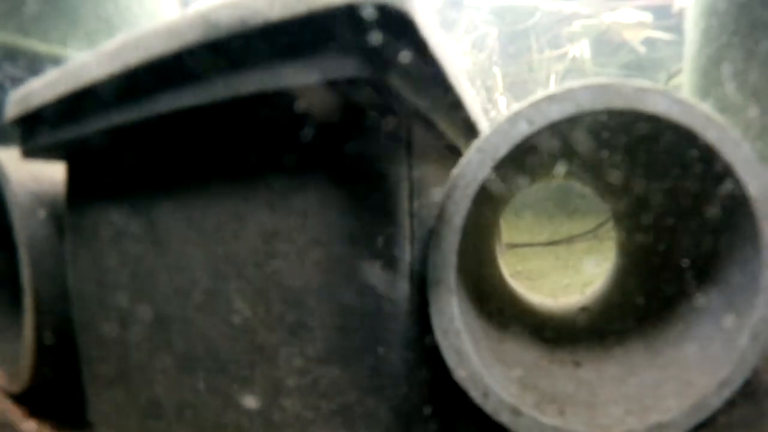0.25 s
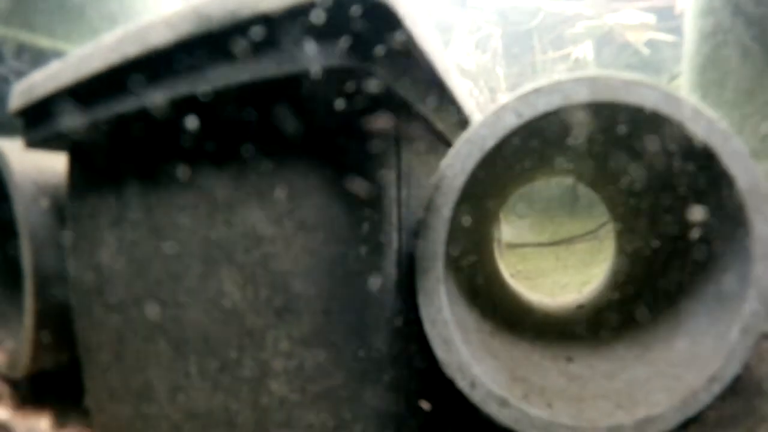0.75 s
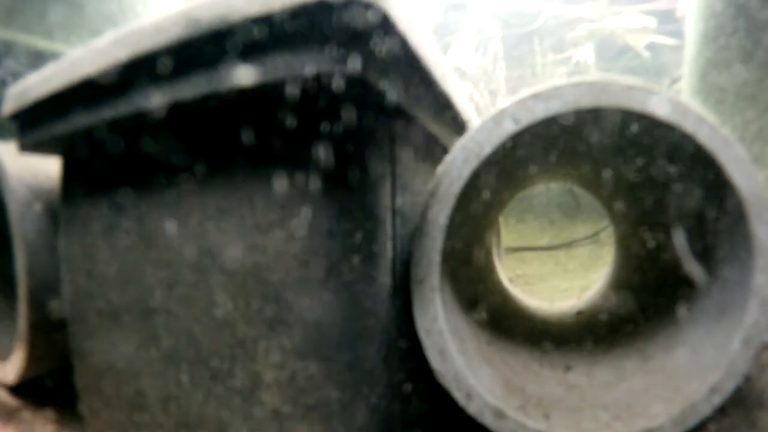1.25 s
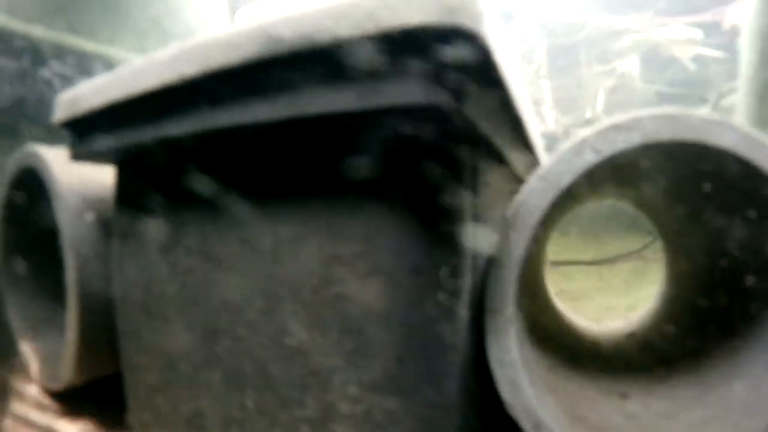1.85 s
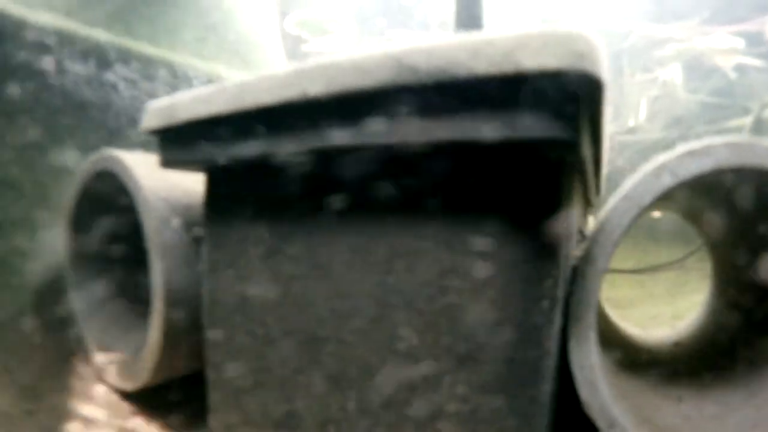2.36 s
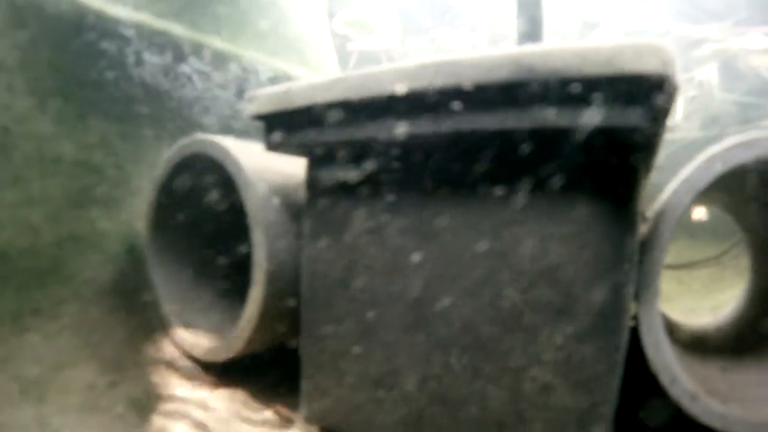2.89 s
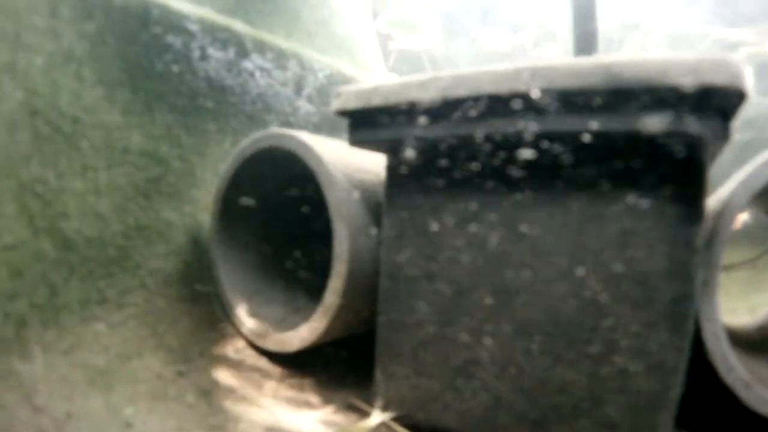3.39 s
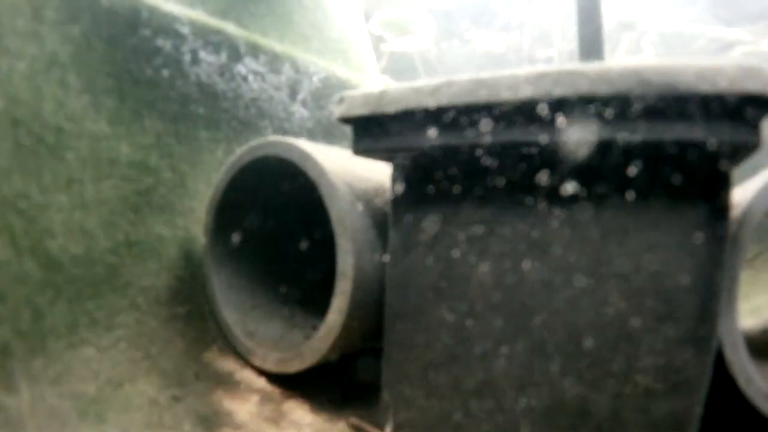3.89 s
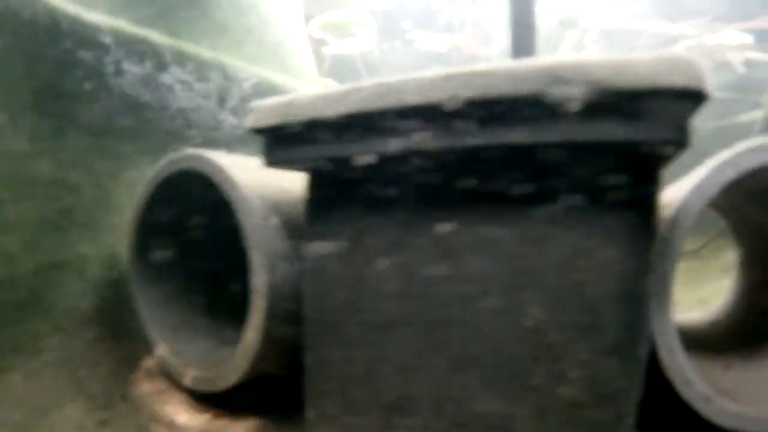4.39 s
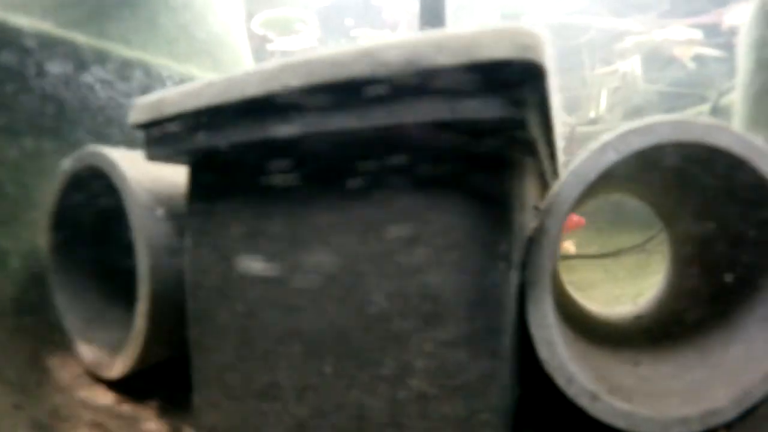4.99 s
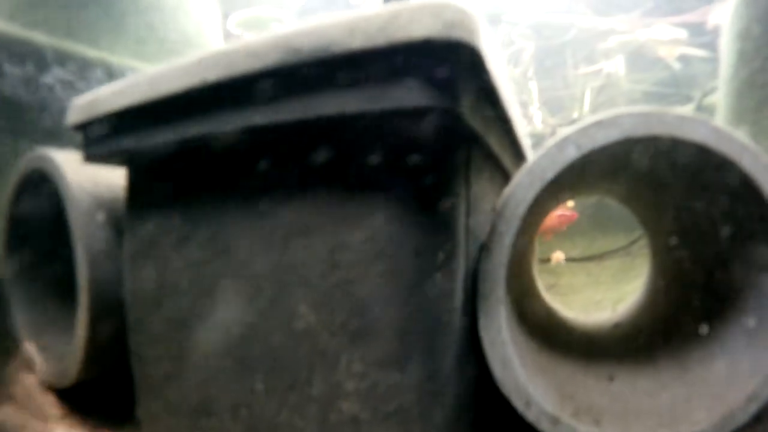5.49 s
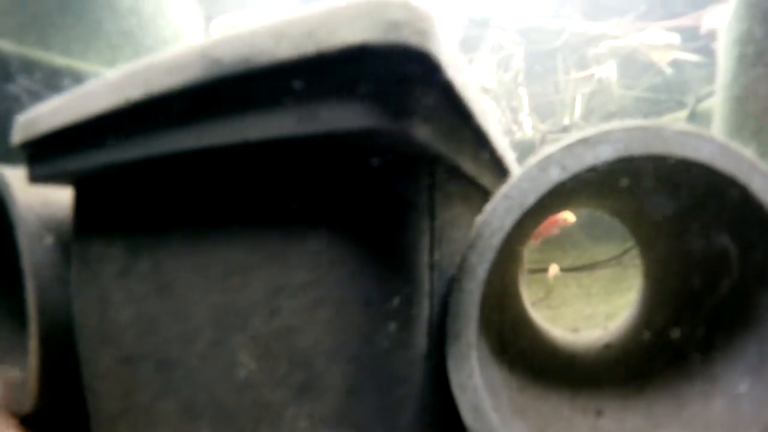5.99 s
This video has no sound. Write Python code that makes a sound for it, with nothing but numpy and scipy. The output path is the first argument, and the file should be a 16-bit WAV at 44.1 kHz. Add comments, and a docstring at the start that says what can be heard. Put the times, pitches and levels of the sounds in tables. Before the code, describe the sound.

A low electrical drone from a submerged filter pump fills the pond, heard through a sealed camera housing. Its impeller ticks quickly, clearer near the pipe, weaker by the box, with short rattles coming and going. Faint rushing water and small bubble pops lie underneath. Very faint rubbing comes early and late; one sharp thudding clack strikes just past halfway, then a gentler thump. The hum continues to the end.

```python
"""Pump hum, light chatter and bouts of rattling are heard from the start and run on in a garden pond.
The hum is a stack of sine and cosine waves; taps and rattles are short noise bursts timed by the turning impeller.
Shaped noise makes the churning and rushing water, and brief resonant bursts make its bubbles.
Now and then a submerged camera's housing is rubbed or knocked: noise and fading tones. As the camera drifts,
the hum, light taps, water rush and small bubbles change level. A gain control tames the peaks, and a coarse
sample-and-hold converter adds a glassy sheen."""
import sys
import numpy as np
from scipy import signal
from scipy.fft import rfft, irfft
from scipy.io import wavfile
from scipy.ndimage import map_coordinates

SR = 44100
rng = np.random.default_rng(int(sys.argv[2]) if len(sys.argv) > 2 else 0)


def store_pcm(level_fs):
    """Save levels as 16-bit WAV."""
    pcm = np.round(np.clip(level_fs, -1, 1) * 32767).astype(np.int16)
    wavfile.write(sys.argv[1], SR, np.atleast_2d(pcm).T)


N = 275625  # length of the scene in samples

# The camera's drift: [time_s, place (0 = mouth of the wide pipe, 1 = in front of the filter box)]
CAMERA_PATH = [(0, 0.071), (1.3, 0), (2.3, 0.28), (3.1, 0.53), (4.05, 1), (4.5, 0.54), (5.1, 0.26),
               (6.25, 0)]

# Churning water: [frequency_hz, relative_level_db per Hz]
CHURN_SPECTRUM = [(10, -13), (28, -13), (44, 1.5), (68, -5), (95, -3.5), (135, 0), (175, -7), (215, -16),
                  (280, -16), (330, -28.5), (500, -45), (900, -56)]
# Rush of the outflow: [frequency_hz, relative_level_db per Hz]
FLOW_SPECTRUM = [(150, -11), (350, -1.5), (500, 0), (680, -4), (830, -2.5), (1130, -11), (1420, -2),
                 (1600, -7), (2100, -2.5), (2600, -6.5), (2850, -10), (3380, -12.5), (3600, -9),
                 (4700, -15), (5800, -16.5), (7000, -34)]
# The largest bubbles: [start_s, peak_db, pitch_hz]
LARGE_BUBBLES = [(.2514, -38, 1474), (.8735, -45, 4060), (2.0856, -41.5, 1430), (2.3095, -43.5, 3950),
                 (2.7037, -38.5, 2270), (2.7752, -41, 3660), (2.855, -43.5, 1690), (4.545, -41.5, 1890),
                 (4.997, -42.5, 3670), (5.032, -41, 1930), (5.1163, -37.5, 1770)]

# Fingers slipping on the housing: [start_s, length_s, level_db]
HOUSING_RUBS = [(1.165, 0.048, -55.5), (1.215, 0.056, -54.5), (4.784, 0.047, -56), (4.81, 0.029, -51.5),
                (5.488, 0.032, -64), (5.584, 0.037, -60)]
# Rasp of skin on the housing: [frequency_hz, relative_level_db per Hz]
RASP_SPECTRUM = [(150, -22), (350, -11), (750, -1), (1050, -17), (3300, -13), (3680, -2.5), (4000, -29),
                 (7000, -35)]
# Blows on the housing: [start_s, hard_face_db, soft_edge_db, thump_db]
HOUSING_KNOCKS = [(3.4915, -19.5, -66, -7), (3.4941, -16, -61, -2), (3.515, -43, -60, -1.5),
                  (3.518, -47, -56, -30), (4.4483, -39, -45, -15), (4.4515, -39, -27, -10),
                  (4.474, -50, -61.5, -32)]
# The crack of a contact: [frequency_hz, relative_level_db per Hz]
CRACK_SPECTRUM = [(150, -32), (300, -20), (480, 3), (680, 6), (1050, -3.5), (1400, 1), (1750, 6.5),
                  (2300, 1), (2650, -3), (3300, -10), (4200, -18), (5800, -16.5), (7000, -60)]
# Tones of the housing, hard face struck: [pitch_hz, level_db, t60_s (time to fade by 60 dB)]
FACE_MODES = [(610, -10, 0.036), (711, -7, 0.031), (885, -20, 0.031), (1320, -10.5, 0.044),
              (1694, -7.5, 0.027), (1977, -10, 0.041), (2180, -8, 0.026), (2260, -6.5, 0.027),
              (2750, -18, 0.025), (3273, -0.5, 0.013), (3525, -12.5, 0.019)]
# Tones of the housing, soft edge struck or rubbed: [pitch_hz, level_db, t60_s]
EDGE_MODES = [(370, -6, 0.085), (448, -5, 0.065), (570, -6, 0.047), (1284, -3, 0.029), (1380, -7.5, 0.053),
              (1790, -1.5, 0.044), (2306, -3.5, 0.056), (3670, -6.5, 0.07)]
# The housing rocking in the water: [pitch_hz, level_db, t60_s]
ROCKING_MODES = [(28, -22, 0.15), (45, -16, 0.31), (87, -5.5, 0.085), (102, -32.5, 0.99)]

# Magnetic hum: [multiple of the mains frequency, relative_level_db]
MAGNETIC_TONES = [(2, -0.5)]
# Shaft vibration: [multiple of the mains frequency, relative_level_db]
SHAFT_TONES = [(1, 2.1), (3, 4.82)]
# Overtones of the hum: [multiple of the mains frequency, relative_level_db]
BUZZ_TONES = [(4, 0.5), (5, -2.5), (6, -15.5), (8, -21.5)]

# Resonances of the pump casing: [pitch_hz, width_hz, level_db]
CASING_RESONANCES = [(1456, 100, 4), (1747, 77, -1), (1999, 138, 3), (2235, 120, 3.5), (2595, 146, 2.5),
                     (3000, 92, -1.5), (3230, 74, -1.5), (3620, 200, 1.5), (4240, 250, -1.5),
                     (5280, 250, 0)]
# Light taps in every turn: [angle (share of a turn), peak_db before drift and chance]
LIGHT_TAPS = [(.68, -47.5), (0.95, -53), (0.1498, -52.5)]
# Bouts of hard rattling: [start_s (moved to the nearest strike), turns, peak_db before chance]
RATTLE_BOUTS = [(.01, 1, -32), (.06, 1, -33), (.21, 4, -34.5), (.28, 2, -33.5), (.33, 1, -38),
                (.51, 1, -42.5), (.78, 1, -33), (.955, 2, -37), (1.01, 2, -37.5), (1.11, 1, -35),
                (1.18, 6, -36.5), (1.33, 1, -35.5), (1.395, 1, -35.5), (1.53, 3, -35.5), (1.58, 1, -33.5),
                (1.66, 1, -40.5), (1.96, 2, -36.5), (2.145, 2, -38), (2.645, 3, -38), (3.06, 4, -39),
                (3.345, 4, -41), (3.695, 21, -40.5), (3.945, 1, -33), (4.13, 3, -39), (4.245, 1, -37),
                (4.68, 1, -34), (4.71, 7, -35.5), (5.38, 7, -38), (5.91, 3, -33)]

# What the drift changes, each as (at the pipe, at the box)
FLOW_DB = (-58.5, -60.5)  # middle level of the outflow rush
MAGNETIC_DB, SHAFT_DB, BUZZ_DB = (-28, -32), (-46.5, -45), (-61, -54.5)  # added to the tone levels
CHATTER_DB = (-1.5, -9.5)  # added to the light taps
CHATTER_HZ = (2070, 2600)  # middle pitch of the impeller's taps and strikes

MAINS_HZ = 59.996  # also the impeller's turns per second
UNREST_DB, UNREST_PER_S = 1.5, 9  # swing of the light chatter, and its random points per second
STRIKE_ANGLE, ANGLE_JITTER = .66, .018  # shares of a turn
REBOUND_DB, STRIKE_SCATTER_DB = 4.5, 1.44  # drop of every second strike; chance spread of the strikes
RASP_DB = 1  # the skin's rasp over the ring of the housing
CEILING_DB, ATTACK_S, RECOVER_DB_PER_S = -7, .02, 61  # gain control
HOLD_HZ, TOP_HZ = 12000, 15400  # converter's slow sample rate; upper limit of the output


def amp(db):
    """Turn decibels into a gain."""
    return 10 ** (np.asarray(db) / 20)


def unit(x):
    """Scale a sound to an average (rms) level of 1."""
    return x / np.sqrt(np.mean(x ** 2) + 1e-20)


def wobble(rate):
    """A smooth random curve through this many random points a second."""
    points = rng.standard_normal(int(N * rate / SR) + 4)
    return map_coordinates(points, [np.arange(N) * rate / SR])


def drift(ends, s):
    """Slide a value between (at the pipe, at the box) as the camera moves, at the times s."""
    times, places = np.transpose(CAMERA_PATH)
    place = np.interp(s, times, places)
    at_pipe, at_box = ends
    return at_pipe + place * (at_box - at_pipe)


def noise(spectrum):
    """Random noise of rms 1, its frequencies weighted by a spectrum table."""
    hz, db = np.transpose(spectrum)
    grid = np.fft.rfftfreq(N, 1 / SR)
    weight = amp(np.interp(np.log(grid + 1), np.log(hz + 1), db))
    return unit(irfft(rfft(rng.standard_normal(N)) * weight, N))


def dying(t, t60):
    """A fading curve that loses 60 dB in t60 seconds."""
    return np.exp(-np.log(1000) * t / t60)


def ring(modes, scatter_db):
    """Half a second of an object's fading tones, with chance changes in their strengths on each call."""
    t = np.arange(SR // 2) / SR
    sound = np.zeros(len(t))
    for hz, db, t60 in modes:
        strength = amp(db + scatter_db * rng.standard_normal())
        sound += strength * dying(t, t60) * np.sin(2 * np.pi * hz * t)
    return sound


def add(track, s, sound):
    """Mix a sound into the track at time s."""
    start = int(np.clip(round(s * SR), 0, N))
    track[start:start + len(sound)] += sound[:N - start]


def ticks(times, db, hz, q, t60, body=np.ones_like, size=2048):
    """Short bursts of crowded reflections, each through its own resonance and a shared body; db sets the peaks."""
    t, f = np.arange(size) / SR, np.fft.rfftfreq(size, 1 / SR)
    bursts = rng.standard_normal((len(times), size)) * dying(t, t60)
    ratio = f / hz[:, None]
    resonance = 1j * ratio / (q * (1 - ratio ** 2) + 1j * ratio)  # a higher q gives a purer pitch
    shapes = irfft(rfft(bursts) * resonance ** 2 * body(f), size)
    track = np.zeros(N)
    for s, gain, shape in zip(times, amp(db), shapes):
        add(track, s, gain * shape / np.abs(shape).max())
    return track


def casing(f):
    """Response of the pump casing: a sum of resonances that strengthens certain pitches."""
    response = 0
    for hz, width, db in CASING_RESONANCES:
        response = response + amp(db) * 1j * f * width / (hz ** 2 - f ** 2 + 1j * f * width)
    return response


def bubbles(count, low_hz, high_hz, db, spread_db, q, t60):
    """Small bubbles, drawn through the pump, pop at random moments; db is (at the pipe, at the box)."""
    when, size, force = rng.random((count, 3)).T
    times = when * N / SR
    peak_db = drift(db, times) + spread_db * force ** 2  # squaring keeps strong pops rare
    pitch_hz = low_hz + size * (high_hz - low_hz)
    return ticks(times, peak_db, pitch_hz, q, t60, body=casing)


def water():
    """Water churns low and rushes out as shaped noise, while bubbles ring briefly at many pitches."""
    churn = amp(-43.5 + 0.91 * wobble(7)) * noise(CHURN_SPECTRUM)
    flow_db = drift(FLOW_DB, np.arange(N) / SR) + 0.68 * wobble(3.0) + 1.3 * wobble(25)
    flow = amp(flow_db) * noise(FLOW_SPECTRUM)
    s, db, hz = np.transpose(LARGE_BUBBLES)
    plops = ticks(s, db, hz, q=8.3, t60=0.018)
    blips = bubbles(count=40, low_hz=1340, high_hz=1490, db=(-54, -63), spread_db=10.0, q=14, t60=0.014)
    crackle = bubbles(count=100, low_hz=1650, high_hz=2450, db=(-50, -60), spread_db=12.5, q=2.8, t60=0.0035)
    fizz = bubbles(count=130, low_hz=3240, high_hz=5060, db=(-59, -57), spread_db=13.5, q=5.2, t60=0.024)
    return churn + flow + plops + blips + crackle + fizz


def rubs():
    """Tiny finger slips rasp and set the housing's soft-edge tones ringing."""
    track = np.zeros(N)
    body = ring(EDGE_MODES, scatter_db=1)
    body = body / np.linalg.norm(body)
    for s, length, db in HOUSING_RUBS:
        n = int(length * SR)
        fade = signal.windows.tukey(n)
        slips = unit(rng.standard_normal(n) ** 3 * fade)  # cubing makes a few slips stand out
        add(track, s, amp(db) * signal.fftconvolve(slips, body))
        add(track, s, amp(db + RASP_DB) * noise(RASP_SPECTRUM)[:n] * fade)
    return track


def knocks():
    """Each blow cracks, rings the housing and rocks it in the water."""
    track, t = np.zeros(N), np.arange(SR // 2) / SR
    for s, face_db, edge_db, thump_db in HOUSING_KNOCKS:
        crack = noise(CRACK_SPECTRUM)[:len(t)] * dying(t, 0.039)
        contact = 1 - dying(t, 0.0019)  # the force builds up as the surfaces press together
        face = amp(face_db) * (crack + ring(FACE_MODES, scatter_db=5.0))
        edge = amp(edge_db) * ring(EDGE_MODES, scatter_db=0.5)
        slow_start = 1 - dying(t, 0.011)
        thump = amp(thump_db) * ring(ROCKING_MODES, scatter_db=1.0) * slow_start
        add(track, s, contact * (face + edge - thump))
    return track


def tone_stack(tones, wave, t):
    """Add up steady waves at multiples of the mains frequency."""
    total = np.zeros(N)
    for multiple, db in tones:
        # the square root of 2 makes db an rms level
        total += np.sqrt(2) * amp(db) * wave(2 * np.pi * multiple * MAINS_HZ * t)
    return total


def hum():
    """The stator pulls twice a mains cycle; a quarter cycle apart, the unbalanced rotor shakes once a turn."""
    t = np.arange(N) / SR
    pull = amp(drift(MAGNETIC_DB, t)) * tone_stack(MAGNETIC_TONES, np.sin, t)
    shake = amp(drift(SHAFT_DB, t)) * tone_stack(SHAFT_TONES, np.cos, t)
    buzz = amp(drift(BUZZ_DB, t)) * tone_stack(BUZZ_TONES, np.sin, t)
    return pull + shake + buzz


def impeller():
    """The loose impeller taps its bearing lightly at nearly the same angles of each turn."""
    turns = np.arange(int(N / SR * MAINS_HZ))
    turn_samples = (turns / MAINS_HZ * SR).astype(int)
    unrest_db = UNREST_DB * wobble(UNREST_PER_S)[turn_samples]
    track = np.zeros(N)
    for angle, tap_db in LIGHT_TAPS:
        late, force, detune = rng.standard_normal((len(turns), 3)).T
        times = (turns + angle + .03 * late) / MAINS_HZ
        force_db = 6.6 * np.tanh(0.79 * force)  # the play in the bearing bounds the swing
        peak_db = tap_db + drift(CHATTER_DB, times) + unrest_db + force_db
        pitch_hz = drift(CHATTER_HZ, times) * np.exp(0.082 * detune)
        track += ticks(times, peak_db, pitch_hz, q=4.1, t60=0.0072, body=casing)
    return track


def rattles():
    """Now and then the impeller strikes hard, once a turn for a few turns, strong and weak by turns."""
    track = np.zeros(N)
    for start, turns, db in RATTLE_BOUTS:
        k = np.arange(round(turns))
        late, force, detune = rng.standard_normal((len(k), 3)).T
        first_turn = round(start * MAINS_HZ - STRIKE_ANGLE)
        times = (first_turn + k + STRIKE_ANGLE + ANGLE_JITTER * late) / MAINS_HZ
        peak_db = db - REBOUND_DB * (k % 2) + STRIKE_SCATTER_DB * force
        pitch_hz = drift(CHATTER_HZ, times) * np.exp(0.066 * detune)
        track += ticks(times, peak_db, pitch_hz, q=3.18, t60=0.0069, body=casing)
    return track


def scene():
    """Everything reaches the one microphone through the water and the housing."""
    return (water() + rubs() + knocks() + hum() + impeller() + rattles())[None]


def gain_control(x):
    """Peaks over the ceiling turn the gain down; it climbs back at a steady rate, with smoothed changes."""
    climb_db = RECOVER_DB_PER_S * np.arange(N) / SR
    over_db = np.maximum(20 * np.log10(np.abs(x[0]) + 1e-9) - CEILING_DB, 0)
    # each peak's cut shrinks steadily until a stronger cut takes over
    cut_db = np.maximum.accumulate(over_db + climb_db) - climb_db
    keep = np.exp(-1 / (ATTACK_S * SR))
    smooth_cut_db = signal.lfilter([1 - keep], [1, -keep], cut_db)
    return x * amp(-smooth_cut_db)


def record(dry):
    """After the gain control, each slow sample is held for four steps, which mirrors sound around its rate."""
    hz = np.fft.rfftfreq(N, 1 / SR)
    anti_alias = 1 / (1 + (hz / 5900) ** 60)  # removes pitches too high for the slow rate
    band_limit = 1 / (1 + (hz / TOP_HZ) ** 140)
    filtered = irfft(rfft(gain_control(dry)) * anti_alias, N)
    slow = signal.resample_poly(filtered, HOLD_HZ, SR, axis=1)
    steps = np.repeat(slow, 4, axis=1)
    held = signal.resample_poly(steps, SR, 4 * HOLD_HZ, axis=1)[:, :N]
    return irfft(rfft(held) * band_limit, N)


dry = scene()
out = record(dry)
store_pcm(out)
```